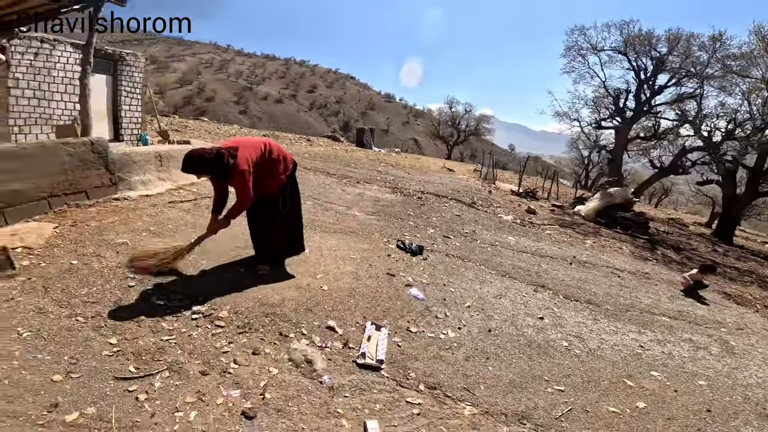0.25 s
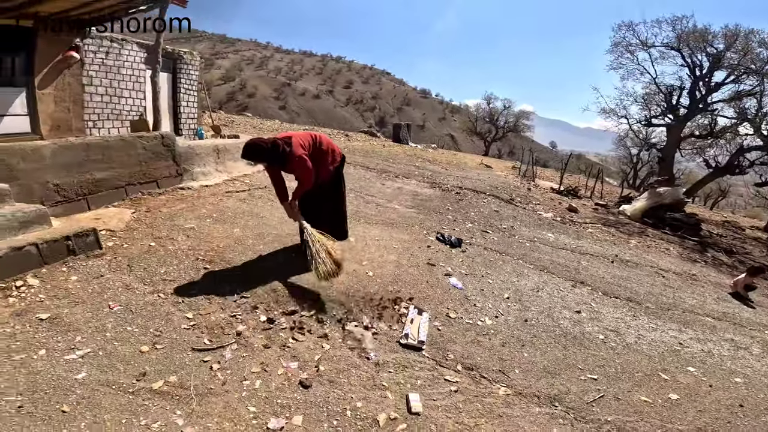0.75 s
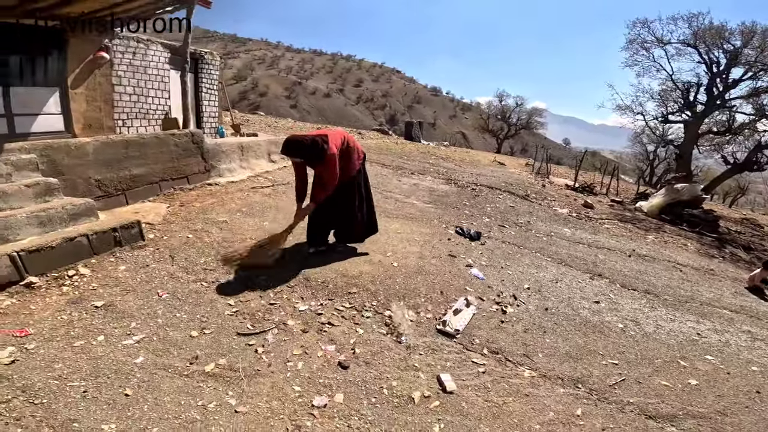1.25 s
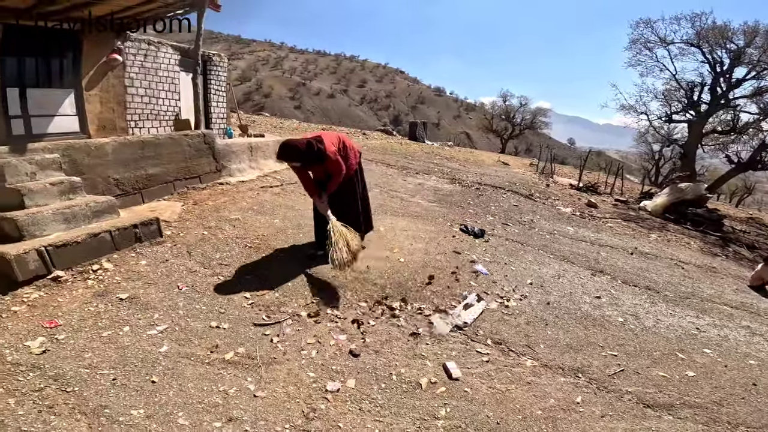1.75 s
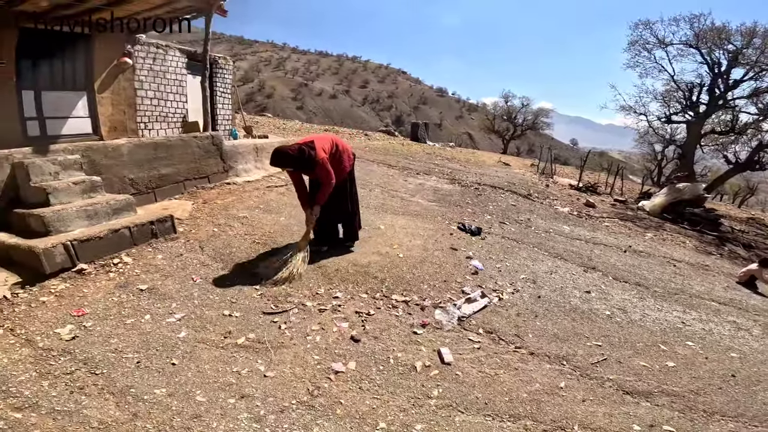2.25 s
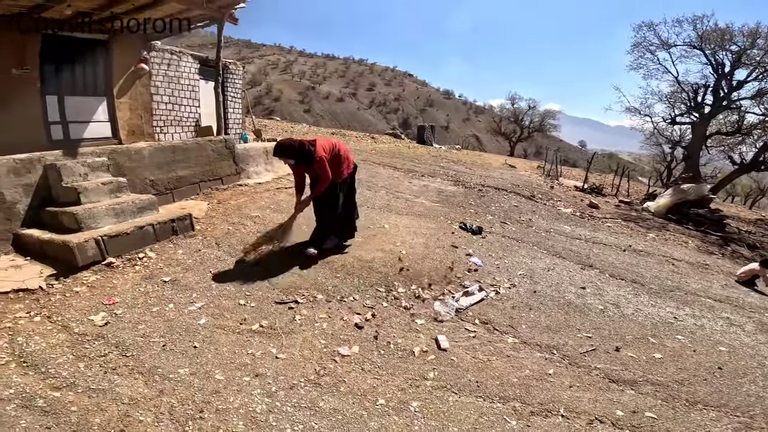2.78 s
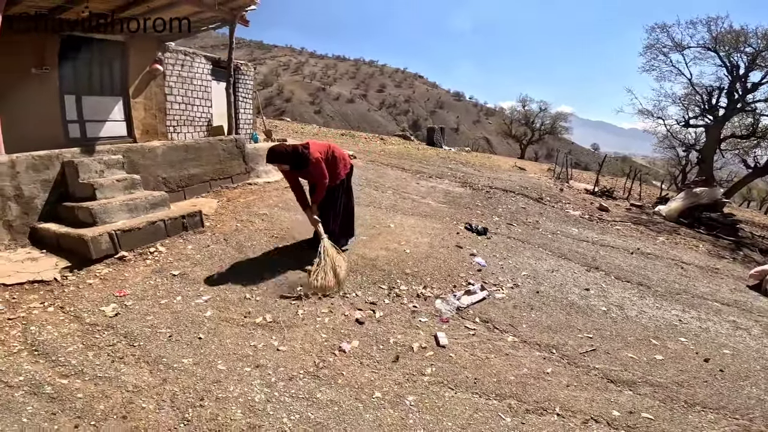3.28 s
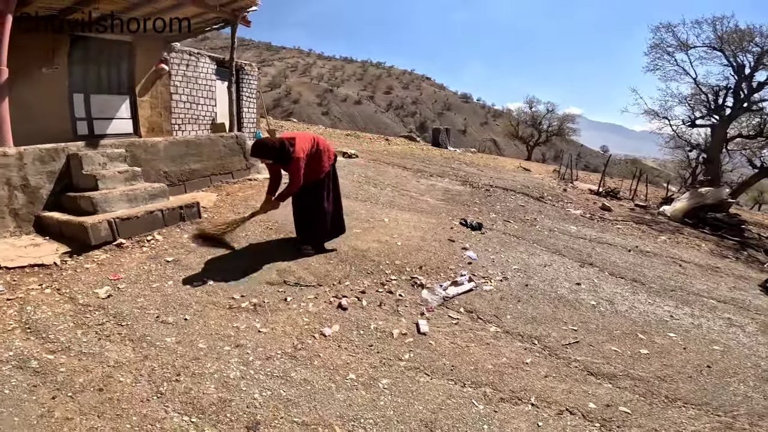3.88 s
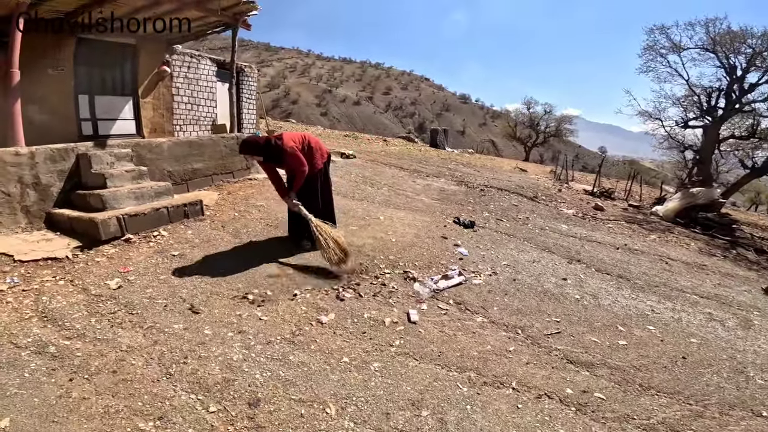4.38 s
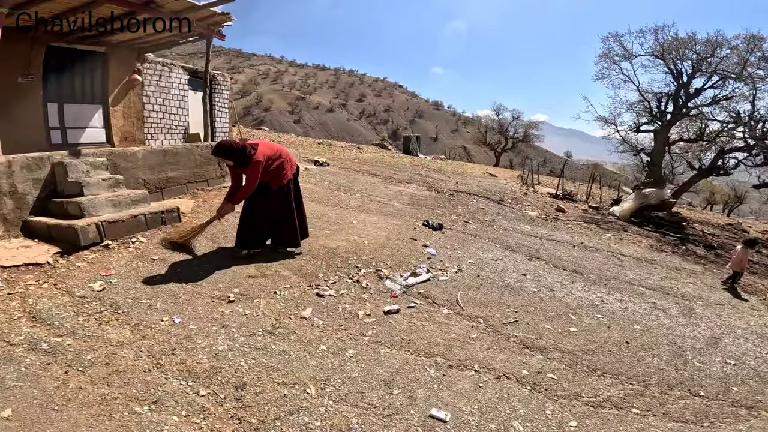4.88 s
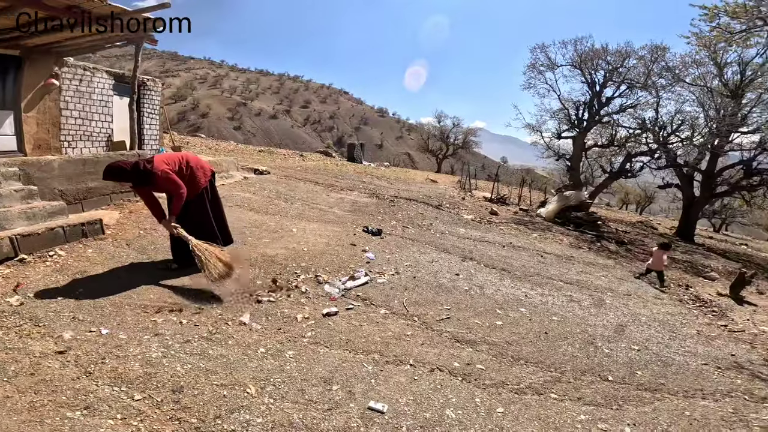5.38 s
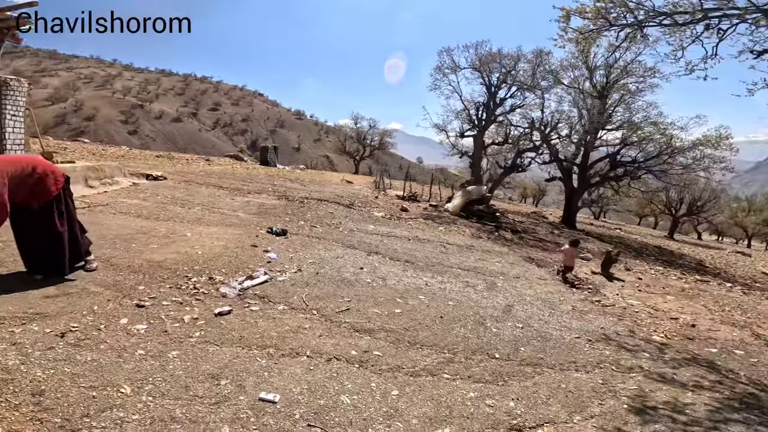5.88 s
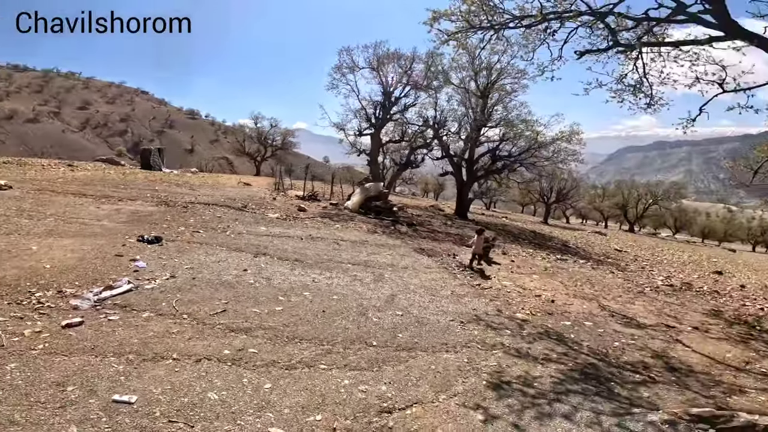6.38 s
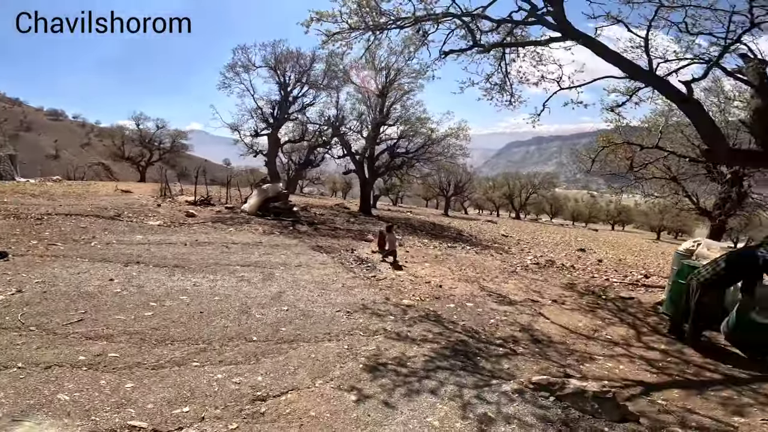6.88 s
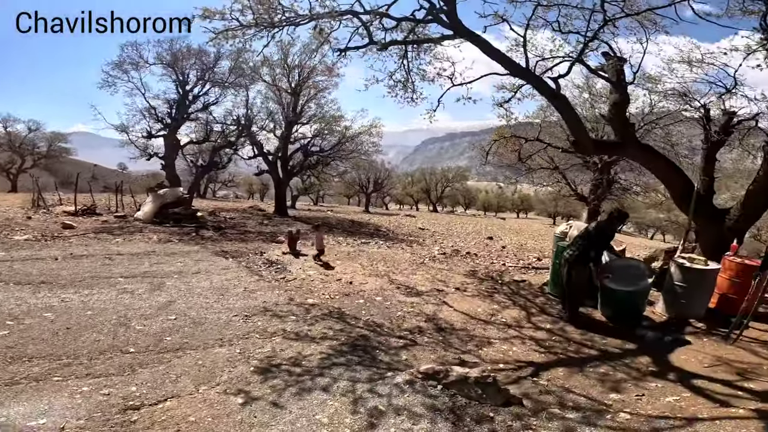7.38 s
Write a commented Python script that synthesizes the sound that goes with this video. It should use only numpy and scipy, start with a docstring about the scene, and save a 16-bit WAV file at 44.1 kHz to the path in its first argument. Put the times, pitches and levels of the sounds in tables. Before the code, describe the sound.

Dry swishing broom strokes rasp over gravelly ground in an open yard, scattering small stones, growing fainter under light wind, with a late chirp.

```python
"""Straw broom on gritty dirt

A short straw broom sweeps an open yard, about one stroke a second, then falls behind the turning microphone.
Each stroke is shaped noise and tiny impacts: straw tips hiss, the bundle digs into the grit, the earth rasps.
Thrown pebbles knock as short decaying modes, bent straws snap, and the yard scatters knocks and chirp.
Filtered noise makes light wind and open air; soft low thuds are swelling sines with a rustle.
Near the end a bird chirps once, a gliding, warbling near-sine, over a faint far tone."""
import sys
import numpy as np
from scipy import signal
from scipy.fft import rfft, irfft
from scipy.io import wavfile
from scipy.ndimage import uniform_filter1d

SR = 44100
rng = np.random.default_rng(int(sys.argv[2]) if len(sys.argv) > 2 else 0)


def put_to_file(sound):
    """Save the sound as 16-bit audio at rate SR, in the file named by the first command-line argument."""
    columns = np.atleast_2d(sound).T  # one column per channel
    safe = np.clip(columns, -1, 1)
    whole_steps = np.round(safe * 32767)
    wavfile.write(sys.argv[1], SR, whole_steps.astype(np.int16))


N = 337276
TIME_S = np.arange(N) / SR

# Table levels are relative; some layers add a trim.
# Strokes: tips drag over the ground, then the bundle pushes grit away and scuffs the earth:
# (touch-down [s], drag rise [s], drag hiss [dB], drag fade [dB/s], sizzle [dB], push delay [s],
#  push hiss [dB], grit [dB], scuff [dB], scuff lag [s], push fade [dB/s], grit fineness [dB],
#  left minus right [dB])
STROKES = [(-0.55, 0.22, -36, 33, -49, 0.59, -38, -35, -51, 0.053, 33, 3, 0),
           (0.3, 0.33, -32.5, 33, -57.5, 0.56, -38, -30, -46, 0.017, 32.5, 0, -1),
           (1.258, 0.27, -31, 23, -56, 0.46, -39.5, -31, -40, 0.022, 32.5, -1, -2),
           (2.179, 0.2, -33, 26.5, -55, 0.5, -39.5, -35.5, -49.5, 0.13, 25, -0.5, -1.9),
           (3.109, 0.14, -35, 8, -54, 0.56, -54, -38, -51, 0.1, 25, -0.5, -1.7),
           (4.024, 0.24, -34, 34, -54.5, 0.52, -43.5, -40.5, -50, 0.14, 23, -0.5, -1.5),
           (4.996, 0.2, -35, 23.5, -52, 0.55, -35.5, -34.5, -47, 0.0078, 30, -2, -0.1),
           (5.94, 0.24, -42, 77, -57, 0.53, -53.5, -56.5, -71, 0.14, 16, -2.5, 4.5),
           (6.909, 0.19, -49, 35, -54.5, 0.32, -69, -61.5, -88, 0.02, 42, 4, 7.5)]
# Pebbles landing, each at a set time:
# (time [s], knock level [dB], pitch [Hz], tick re knock [dB], ring time factor [1])
PEBBLES = [(0.0236, -15, 2840, -22, 2), (0.172, -15, 2270, -10, 1.2), (0.3514, -16.5, 3000, -17, 0.55),
           (0.8404, -6.5, 2730, -17, 0.59), (0.8717, -17, 2850, -3, 1.1), (0.9592, -23, 1090, 1, 1.9),
           (0.97, -24.5, 1080, 1, 2.9), (1.0596, -10, 1610, -34, 0.36), (1.098, -19, 2530, -7, 1.2),
           (1.1405, -20.5, 2680, -8, 1.1), (1.1758, -18.5, 3340, -12, 0.84), (1.304, -24.5, 1210, -16, 0.8),
           (1.7175, -22, 2170, -24, 0.46), (1.8756, -18.5, 1900, -21, 0.7), (1.915, -22, 2150, 2, 0.61),
           (2.073, -18.5, 1440, -14, 0.3), (2.1003, -23.5, 2680, -4, 0.39), (2.1412, -23.5, 2040, -8, 0.28),
           (2.695, -25, 1350, -12, 0.81), (2.7725, -22, 2700, -37, 1.2), (2.7933, -25.5, 1270, -6, 2.1),
           (2.89, -22, 2600, -8, 0.88), (2.9228, -36, 2300, 10, 0.93), (2.9644, -23, 2730, -3, 0.84),
           (3.0427, -29, 2720, -8, 1), (3.0654, -28.5, 1290, -13, 0.47), (3.1316, -17.5, 2880, -3, 0.4),
           (3.1535, -21, 1490, -12, 2.1), (3.767, -26, 1260, -16, 1.7), (3.7903, -17, 1730, -15, 0.45),
           (3.8484, -22, 2300, -12, 1.3), (3.9411, -15.5, 1670, -7, 0.28), (4.0354, -34, 3000, 7.5, 1.2),
           (4.0552, -35, 1230, -3, 2.6), (4.7543, -26.5, 1370, 1.5, .9), (4.8351, -26.5, 1320, -23, 1),
           (4.9944, -22, 2030, -1, 0.4), (5.5563, -24, 1300, -25, 1), (5.6639, -21.5, 1520, -12, 1.7),
           (5.7785, -16, 2130, -11, 0.56), (5.8035, -13.5, 2070, -8, 0.49), (5.852, -20, 1540, -5, 1.5),
           (5.866, -31.5, 1070, 9, 4.5), (5.89, -24.5, 1340, -15, 1.4), (5.9106, -20.5, 1720, -3, 0.37),
           (6.301, -27, 1280, -48.5, 3.4), (6.3886, -32, 2920, -3, 0.38), (6.8035, -39.5, 1340, 5, 1),
           (6.927, -37, 1340, 5, 3.3), (7.6085, -42, 1820, -18, 0.47)]
# Pebble resonances: (multiple of pitch [1], level [dB], cycles to -60 dB at ring factor 1 [1])
PEBBLE_MODES = [(1.0, 33, 4.64), (1.45, -31, 1), (.8, -18, 4.3), (2.0, -14, 4.8)]
# Single straws that catch and flick free: (time [s], level [dB])
FLICKS = [(0.0553, -18), (0.806, -17.5), (1.4552, -11.5), (2.025, -26), (2.6467, -18), (2.7734, -25),
          (2.95, -26), (3.1335, -29), (3.6363, -21), (4.3814, -23), (4.5077, -21.5), (4.583, -12.5),
          (5.803, -37), (5.9143, -27.5), (6.457, -35.5), (6.5072, -40)]
# Soft low thuds: (time of height [s], level [dB], pitch [Hz], length [s])
THUDS = [(0.645, -48.5, 189, 0.12), (2.93, -54, 154.4, 0.098), (3.31, -55, 150, 0.063),
         (4.23, -66, 86, 0.25), (4.85, -43, 67, 0.065), (4.9, -52.5, 148, 0.28), (5.345, -44.5, 114, 0.23),
         (5.87, -59, 85, 0.092), (6.15, -62, 86, 0.2), (6.65, -61.5, 100, 0.24), (7.06, -58, 150.7, 0.22)]
# Gusts at the microphone: (time of height [s], level [dB], half length at -6 dB [s])
GUSTS = [(0.503, -40, 0.25), (1.2, -36.5, 0.16), (2.555, -34.5, 0.073), (3.76, -35, 0.15),
         (4.335, -35, 0.076), (4.88, -36, 0.1), (5.888, -36, 0.21), (6.176, -43, .22), (6.9, -33.5, 0.14),
         (7.115, -38.5, 0.073), (7.554, -39, 0.089)]
# Faint far tone under and after the chirp: (time [s], pitch [Hz], level [dB])
FAR_TONE = [(7.40, 615, -92), (7.425, 616, -63), (7.46, 560, -66), (7.53, 640, -97), (7.59, 585, -72)]

# Filter shapes, scaled to unit energy in use: (frequency [Hz], gain [dB])
# straw tips
STRAW_SPECTRUM = [(150, -50), (700, -55), (1200, -7.5), (2400, -4), (3200, -2.5), (5000, 0.5), (7000, 1.5),
                  (8700, 0.5), (9500, -9.5), (10500, -20), (16000, -36)]
# straw tips heard from the side of the microphone
STRAW_ASIDE_SPECTRUM = [(150, -24.5), (750, -17), (1300, -2), (2300, -7), (3200, -3), (4500, -2),
                        (6500, -7), (8500, -12), (9500, -10.5), (11000, -21), (16000, -18)]
# sand under the bundle
GRIT_SPECTRUM = [(200, -35), (600, -34), (850, -11), (1100, 0.5), (1500, 1), (2200, 3), (2900, 6),
                 (3800, 2.5), (5500, -6.5), (9000, -75), (11000, -43)]
# packed earth
SCUFF_SPECTRUM = [(120, -18), (300, -13.5), (430, 1.5), (600, 1.5), (780, 2.5), (1050, 5.5), (1400, -13),
                  (2200, -9), (6000, -45)]
# bundle moving air and brushing ground
SWISH_SPECTRUM = [(50, -23), (100, -15.5), (160, 0), (250, -3.5), (370, -5.5), (480, -20.5), (900, -26.5),
                  (4000, -62)]
# highest hiss of the tips
SIZZLE_SPECTRUM = [(5000, -48), (9000, -13), (10700, -1), (12300, 6), (14500, -2), (16000, -11.5)]
# open air
AIR_SPECTRUM = [(30, -19), (90, -22), (160, -2), (250, -1), (380, -3), (560, -6), (800, -19), (1300, -2),
                (2200, -18), (4500, -1), (8000, -4), (10500, -34), (16000, -28)]
# wind at the ports
WIND_SPECTRUM = [(10, 12), (28, 2), (42, -2.5), (60, -17), (100, -31), (250, -57), (1000, -67)]
# muffled rustle on the thuds
RUSTLE_SPECTRUM = [(30, -3), (120, 1.5), (250, -2), (380, -1), (900, -14), (4000, -77)]

# Short scatter from ground, steps and wall: (frequency [Hz], t60 [s])
YARD_DECAY = [(200, 0.16), (1200, 0.072), (4000, 0.076), (12000, 0.0078)]
# Microphone ports before the turn: (frequency [Hz], phase lead of left [rad])
PORT_PHASE = [(20, 1), (1500, 0.014), (3200, -0.79), (5500, -0.41), (9000, -0.17), (12000, -1.24),
              (16000, -1.2)]

# Drag: light landing, firmer pressure, then easing off
DRAG_LANDING_DB, LANDING_S = -22.5, 0.029
# layers under the drag, re its hiss
DRAG_GRIT_DB, DRAG_SCUFF_DB, DRAG_SWISH_DB = -13, -22.5, -33
# sizzle: weighted to the landing
SIZZLE_LANDING_DB, SIZZLE_FADE_DB_PER_S = -12, 45
# push and scuff: attack, hold; scuff has its own release
PUSH_RISE_DB_PER_S, PUSH_HOLD_S = 165, 0.068
SCUFF_HOLD_S, SCUFF_FADE_DB_PER_S = 0.017, 58
# swish: re the push's grit; floor
PUSH_SWISH_DB, SWISH_REST_DB = -27.5, -77.5
# each stroke starts further left and swings right: left-minus-right excess, Gaussian width
SWING_DB, SWING_S = 2, 1
# rub breaking into ticks: ramp time, final power share, rate, power decay, size spread
BREAKUP_S, BREAKUP_SHARE, TICKS_PER_S, TICK_S, TICK_SPREAD_DB = 0.23, 0.58, 110, 0.0025, -2
# broom in the air before touch-down: dip, lead, Gaussian width
AIRBORNE_DB, AIRBORNE_LEAD_S, AIRBORNE_S = -3.5, 0.07, 0.085
# pebbles scattered at random after a push: delay, longest flight, level re grit, spread either way
SCATTER_DELAY_S, SCATTER_FLIGHT_S, SCATTER_DB, SCATTER_SPREAD_DB = 0.01, 0.46, 7, 9
BREEZE_DB = -48.5  # on the scale of GUSTS
# chirp; pitches are before the warble
CHIRP_S, CHIRP_LENGTH_S, CHIRP_DB, CHIRP_FADE_DB_PER_S = 7.382, 0.12, -48, 35
CHIRP_TOP_HZ, CHIRP_END_HZ, CHIRP_RISE_S, CHIRP_FALL_S = 5290, 3070, 0.014, 0.025
WARBLE_HZ, WARBLE_DEPTH = 40.5, 0.14
EDGE_HZ = 15900  # band limit


def gain_of(db):
    """Decibels to amplitude."""
    return 10 ** (np.asarray(db) / 20)


def together(levels_db):
    """Power sum of levels in dB."""
    return 10 * np.log10(sum(gain_of(db) ** 2 for db in levels_db) + 1e-14)


def evened(x):
    """Scales to rms 1."""
    return x / np.sqrt(np.mean(x ** 2) + 1e-20)


def read(points, hz):
    """Interpolates a frequency table on a log axis."""
    f, value = np.transpose(points)
    return np.interp(np.log(hz + 1), np.log(f + 1), value)


def curves(rows):
    """Columns of a time table at every sample."""
    s, *columns = np.transpose(rows)
    return [np.interp(TIME_S, s, column) for column in columns]


def add(mix, s, sound):
    """Mixes a (channels, samples) sound in at time s."""
    part = mix[:, max(round(s * SR), 0):][:, :sound.shape[1]]
    part += sound[:, :part.shape[1]]


def placed(x, pan_db):
    """Two channels with a left-minus-right level difference."""
    return np.array([x * gain_of(pan_db / 2), x * gain_of(-pan_db / 2)])


def colour(x, spectrum, size=4096):
    """Minimum-phase filter of unit energy: clicks keep sharp fronts."""
    hz = abs(np.fft.fftfreq(size, 1 / SR))
    log_gain = np.log(gain_of(read(spectrum, hz)))
    minimum_phase = np.exp(np.conj(signal.hilbert(log_gain)))
    taps = np.fft.ifft(minimum_phase).real[:size // 2]
    return signal.oaconvolve(x, taps / np.linalg.norm(taps))[:len(x)]


def tilted(x, tilt_db, pivot_hz=1900):
    """Shifts the balance about the pivot; positive tilt favours the top."""
    hz = np.fft.rfftfreq(N, 1 / SR)
    body = irfft(rfft(x) / (1 + (hz / pivot_hz) ** 6), N)
    return body * gain_of(-tilt_db) + (x - body) * gain_of(tilt_db)


def no_bass(x, corner_hz=760):
    """Things as small as pebbles radiate almost no bass."""
    return signal.sosfilt(signal.butter(3, corner_hz, "high", fs=SR, output="sos"), x)


def wander(rate_hz):
    """Low-passed random drift of rms 1."""
    hz = np.fft.rfftfreq(N, 1 / SR)
    return evened(irfft(rfft(rng.standard_normal(N)) / (1 + (hz / rate_hz) ** 2), N))


def contacts(per_s, spread_db):
    """Random impacts, rms 1; positive spread makes a few large, negative a few small."""
    size = gain_of(spread_db * np.minimum(rng.exponential(1, N), 4))
    struck = rng.random(N) < per_s / SR
    return evened(size * rng.choice([-1, 1], N) * struck)


def outdoors():
    """Even wash of open air, and lumpy low wind at the two ports: gusts over a light breeze."""
    gusts_db = [db - 6 * np.minimum(abs(TIME_S - s) / half_s, 4) ** 2 for s, db, half_s in GUSTS]
    gust_db = together([BREEZE_DB] + gusts_db)
    # rows: left, right, shared
    air = np.array([colour(z, AIR_SPECTRUM) for z in rng.standard_normal((3, N))])
    wind = np.array([colour(z, WIND_SPECTRUM, size=16384) for z in rng.standard_normal((3, N))])
    wash = gain_of(-64.5) * (air[2] + 1.13 * air[:2])
    blowing = (wind[2] + 0.33 * wind[:2]) * gain_of(gust_db - 3.5)
    return wash + blowing * gain_of([[-3], [2]])


def drag(t, rise_s, landing_db, fade_db_per_s):
    """Level [dB] after touch-down: rounded rise, then even fade."""
    landed = np.clip(t / LANDING_S, 1e-6, 1)
    pressing_db = landing_db * np.clip(1 - t / rise_s, 0, 1) ** 2
    return 20 * np.log10(landed) + pressing_db - fade_db_per_s * np.maximum(t - rise_s, 0)


def push(t, hold_s, fade_db_per_s):
    """Level [dB] round the push: attack, hold, release."""
    return PUSH_RISE_DB_PER_S * np.minimum(t, 0) - fade_db_per_s * np.maximum(t - hold_s, 0)


def stroke_levels(size=64):
    """Levels [dB] of straw, grit, scuff, swish and sizzle, from every drag and push."""
    clock, parts = TIME_S[::size], []
    for (s, rise_s, hiss_db, drag_fade, sizzle_db, delay_s,
         push_db, grit_db, scuff_db, lag_s, push_fade, _, _) in STROKES:
        t = clock - s
        lifted = push(np.maximum(t - delay_s, 0), PUSH_HOLD_S, push_fade)
        dragging = hiss_db + drag(t, rise_s, DRAG_LANDING_DB, drag_fade) + lifted
        pushing = push(t - delay_s, PUSH_HOLD_S, push_fade)
        digging = push(t - delay_s - lag_s, SCUFF_HOLD_S, SCUFF_FADE_DB_PER_S)
        parts.append([together([dragging, push_db + pushing]),
                      together([dragging + DRAG_GRIT_DB, grit_db + pushing]),
                      together([dragging + DRAG_SCUFF_DB, scuff_db + digging]),
                      together([dragging + DRAG_SWISH_DB, grit_db + PUSH_SWISH_DB + pushing]),
                      sizzle_db + drag(t, rise_s, SIZZLE_LANDING_DB, SIZZLE_FADE_DB_PER_S)])
    return [np.interp(TIME_S, clock, level) for level in together(np.array(parts))]


def stroke_now(starts_s):
    """Index of the latest stroke to touch down, at every sample."""
    return np.maximum(np.searchsorted(starts_s, TIME_S) - 1, 0)


def stroke_places(size=1500):
    """Grit fineness and left-minus-right level [dB] as each stroke swings across its patch."""
    starts_s, *_, fine_db, pan_db = np.transpose(STROKES)
    now = stroke_now(starts_s)
    swing_db = SWING_DB * np.exp(-((TIME_S - starts_s[now]) / SWING_S) ** 2)
    return uniform_filter1d(fine_db[now], size), uniform_filter1d(pan_db[now] + swing_db - 0.5, size)


def straw(level_db):
    """Straw tips stick and slip; the hiss changes colour as the microphone turns away."""
    tips = evened(contacts(per_s=9000, spread_db=4.0) + gain_of(-11.5) * rng.standard_normal(N))
    aside = np.interp(TIME_S, [6.2, 7.0], [0, 1])
    facing_hiss = (1 - aside) * colour(tips, STRAW_SPECTRUM)
    aside_hiss = aside * gain_of(2.5) * colour(tips, STRAW_ASIDE_SPECTRUM)
    return (facing_hiss + aside_hiss) * gain_of(level_db + 0.5)


def knock(hz, ring, rise_cycles, size=1024):
    """A stone on packed earth: soft front, a few cycles of each mode, peak 1."""
    cycles = hz * np.arange(size) / SR
    modes = np.zeros(size)
    for multiple, db, life_cycles in PEBBLE_MODES:
        decay = gain_of(db - 60 * cycles / (life_cycles * ring))
        modes += decay * np.sin(2 * np.pi * (multiple * cycles + rng.uniform(0, 1 / 4)))
    sound = modes * (1 - np.exp(-(cycles / rise_cycles) ** 2))
    return sound / abs(sound).max()


def grit(level_db, fine_db, per_s=150):
    """Sand grinds under the bundle; bits of gravel, each with its own pitch, tumble along."""
    sand = colour(contacts(per_s=4500, spread_db=4.0) + 0.26 * rng.standard_normal(N), GRIT_SPECTRUM)
    gravel = np.zeros((1, N))
    for when, kind, weight in rng.random((round(per_s * N / SR), 3)):
        size_db = 3.6 * min(-np.log(weight), 3)
        bit = knock(950 * 3.88 ** kind, ring=3.3, rise_cycles=0.48)
        add(gravel, when * N / SR, gain_of(size_db) * bit[None])
    rolling = sand + gain_of(-9.5) * evened(no_bass(gravel[0]))
    return tilted(rolling, fine_db) * gain_of(level_db + 1.2 * wander(rate_hz=50))


def scuff(level_db):
    """Packed earth answers the drag of the bundle with a dull rasp."""
    return colour(contacts(per_s=4000, spread_db=3.5), SCUFF_SPECTRUM) * gain_of(level_db + 2.57)


def swish(level_db):
    """The whole bundle pushes air and brushes the ground softly."""
    unsteady_db = level_db + 2.5 + 2.2 * wander(rate_hz=6.7)
    return colour(rng.standard_normal(N), SWISH_SPECTRUM) * gain_of(unsteady_db)


def broom(straw_db, grit_db, scuff_db, swish_db, fine_db):
    """Straw, grit, ground and bundle together; bumps over the ground unsettle the scuff."""
    bumps_db = 2 * wander(rate_hz=54)
    rub = straw(straw_db) + grit(grit_db - 0.5, fine_db)
    return rub + scuff(scuff_db + bumps_db) + swish(together([swish_db, SWISH_REST_DB]))


def breakup(size=24):
    """Gain on the rub: even in the drag, breaking into ticks around the push, weaker in mid-air."""
    starts_s, _, _, _, _, delays_s, *_ = np.transpose(STROKES)
    after_push_s = TIME_S - (starts_s + delays_s)[stroke_now(starts_s)]
    # the ramp begins 0.43 of its length before the push
    share = BREAKUP_SHARE * np.clip(after_push_s / BREAKUP_S + 0.43, 0, 1)
    tick_power = contacts(TICKS_PER_S, TICK_SPREAD_DB) ** 2
    bursts = signal.lfilter([1], [1, -np.exp(-1 / (TICK_S * SR))], tick_power)
    airborne = sum(np.exp(-((TIME_S - s + AIRBORNE_LEAD_S) / AIRBORNE_S) ** 2) for s in starts_s)
    rattle = np.sqrt(1 - share + share * bursts / bursts.mean())
    return uniform_filter1d(rattle, size) * gain_of(AIRBORNE_DB * airborne)


def sizzle(level_db):
    """The highest hiss reaches each port differently, and the left one more."""
    shared = contacts(per_s=21000, spread_db=-9)
    left, right = (colour(evened(shared + 1.3 * rng.standard_normal(N)), SIZZLE_SPECTRUM) for _ in range(2))
    return np.array([left * gain_of(1.5), right * gain_of(-14.0)]) * gain_of(level_db)


def sweeping(fine_db, pan_db):
    """Bunched straws catch and let go together; their spread makes the ports differ."""
    *levels_db, sizzle_db = stroke_levels()
    catching = gain_of(1.2 * wander(rate_hz=40))
    spread = gain_of(-15) * broom(*levels_db, fine_db)
    rub = placed(broom(*levels_db, fine_db), pan_db) + np.array([spread, -spread])
    return (rub * breakup() + sizzle(sizzle_db)) * catching + flicks(pan_db)


def scattered_pebbles(count=12):
    """More pebbles scattered at random after each push, on average fainter later: rows as in PEBBLES."""
    rows = []
    for s, _, _, _, _, delay_s, _, grit_db, _, _, fade, _, _ in STROKES:
        for when, kind, weight, hard in rng.random((count, 4)):
            flight_s = SCATTER_FLIGHT_S * when
            db = grit_db + SCATTER_DB + SCATTER_SPREAD_DB * (1 - 2 * weight) - 1.52 * fade * flight_s
            landing_s = s + delay_s + SCATTER_DELAY_S + flight_s
            rows.append((landing_s, db, 1100 * 2.76 ** kind, -7 + 9 * hard, 1.2))
    return rows


def pebbles(pan_db, size=1024):
    """Thrown pebbles knock on the ground with a gritty tick, then chatter faintly as they settle."""
    out, t = np.zeros((1, N)), np.arange(size) / SR
    for s, db, hz, tick_db, ring in [*PEBBLES, *scattered_pebbles()]:
        blow = no_bass(knock(hz, ring=ring, rise_cycles=1.1))
        blow = blow / abs(blow).max()
        tick = colour(rng.standard_normal(size) * t * np.exp(-t / 0.0003), STRAW_SPECTRUM)
        settling = rng.standard_normal(size) * np.sqrt(t) * np.exp(-t / 0.0053)
        chatter = np.convolve(blow, settling)[:size]
        sound = blow + gain_of(tick_db) * tick / abs(tick).max()
        sound = sound + gain_of(-14) * chatter / abs(chatter).max()
        add(out, s, gain_of(db) * sound[None])
    return placed(out[0], pan_db - 0.5)


def yard(x, size=11025):
    """Weak scattered reflections, different at each port, dying at a rate set by frequency."""
    taps = rng.standard_normal((2, size)) * (rng.random((2, size)) < 0.1)
    hz, t, z = signal.stft(taps, SR, nperseg=128)
    decay = gain_of(-60 * t / read(YARD_DECAY, hz)[:, None])
    tail = signal.istft(z * decay, SR, nperseg=128)[1]
    tail = tail / np.linalg.norm(tail, axis=1, keepdims=True)
    return signal.fftconvolve(x, tail, axes=1)[:, :N]


def flicks(pan_db, size=512):
    """A bent straw springs free with a dry snap."""
    out, t = np.zeros((1, N)), np.arange(size) / SR
    for s, db in FLICKS:
        snap = colour(rng.standard_normal(size) * np.exp(-t / 0.0015), STRAW_SPECTRUM)
        add(out, s, gain_of(db) * snap[None] / abs(snap).max())
    return placed(out[0], pan_db)


def thuds():
    """Soft low swells of a sine with a muffled rustle on top."""
    out = np.zeros((2, N))
    for s, db, hz, length_s in THUDS:
        t = np.arange(round(length_s * SR)) / SR
        rustle = colour(rng.standard_normal(SR), RUSTLE_SPECTRUM)[:len(t)]
        swell = np.sin(np.pi * t / length_s) ** 2
        sound = (0.66 * np.sin(2 * np.pi * hz * t) + 0.74 * rustle) * swell
        add(out, s - length_s / 2, placed(gain_of(db) * sound, -1.6))
    return out


def whistle(rows, flutter):
    """A near-sine follows its pitch and level rows, with a fine unsteadiness."""
    hz, level_db = curves(rows)
    turns = np.cumsum(hz * (1 + flutter * wander(rate_hz=330))) / SR
    sounding = (TIME_S > rows[0][0]) & (TIME_S < rows[-1][0])
    return np.sin(2 * np.pi * turns) * gain_of(level_db + 1.8 * wander(rate_hz=110)) * sounding


def bird():
    """One chirp: a quick leap, then a fall, with a warble that deepens towards the end."""
    t = np.linspace(0, CHIRP_LENGTH_S, 200)
    along, past_top_s = t / CHIRP_LENGTH_S, t - CHIRP_RISE_S
    arch = np.exp(-(past_top_s / np.where(past_top_s < 0, CHIRP_RISE_S, CHIRP_FALL_S)) ** 2)
    glide_hz = CHIRP_END_HZ + (CHIRP_TOP_HZ - CHIRP_END_HZ) * arch
    hz = glide_hz * (1 + WARBLE_DEPTH * along * np.cos(2 * np.pi * WARBLE_HZ * t))
    level_db = CHIRP_DB - CHIRP_FADE_DB_PER_S * t - 14 * abs(2 * along - 1) ** 6
    return placed(whistle(np.transpose([CHIRP_S + t, hz, level_db]), flutter=0.05), -2)


def far_tone():
    """A faint far near-sine with a gliding pitch, equal in both channels."""
    return whistle(FAR_TONE, flutter=0.0104)


def scene():
    """Sweeping, stones, bird, tone, thuds and wind in the open yard."""
    fine_db, pan_db = stroke_places()
    stones, chirp = pebbles(pan_db), bird()
    scatter = yard(gain_of(-14.5) * stones + gain_of(0.5) * chirp)
    return sweeping(fine_db, pan_db) + stones + chirp + scatter + far_tone() + thuds() + outdoors()


def record(dry):
    """The ports hear sound out of step, in an order that swaps with the turn; then the band limit."""
    half_turn = np.exp(0.5j * read(PORT_PHASE, np.fft.rfftfreq(N, 1 / SR)))
    shift = np.array([half_turn, half_turn.conj()])
    turned = np.interp(TIME_S, [5.9, 6.6], [0, 1])
    before = irfft(rfft(dry) * shift, N)
    after = irfft(rfft(dry) * shift.conj(), N)
    ports = (1 - turned) * before + turned * after
    low_pass = signal.firwin(511, EDGE_HZ, window=("kaiser", 9), fs=SR)
    return signal.oaconvolve(ports, low_pass[None], "same")


dry = scene()
out = record(dry)
put_to_file(out)
```